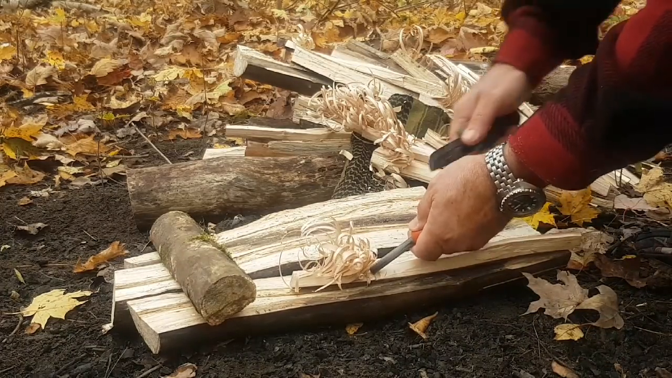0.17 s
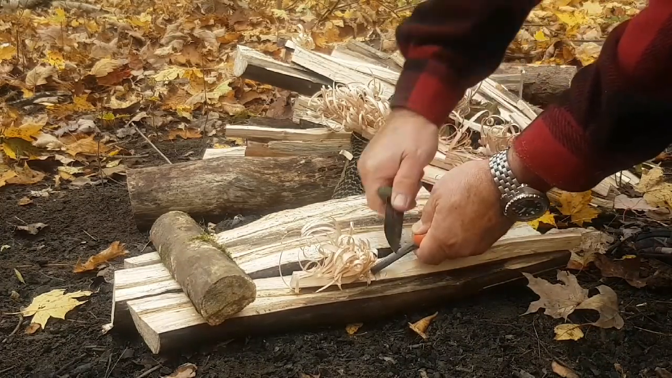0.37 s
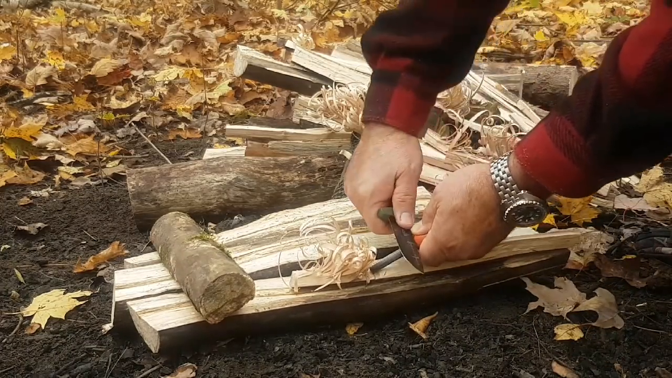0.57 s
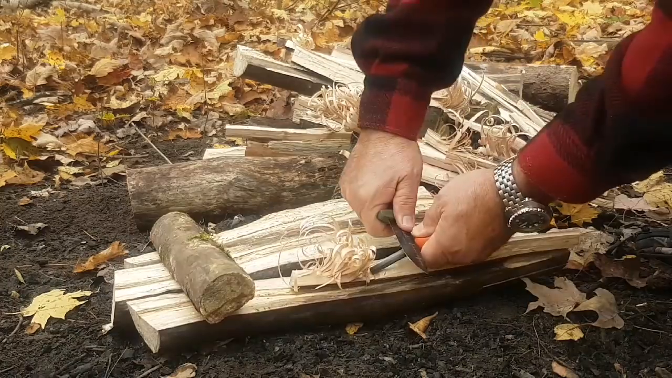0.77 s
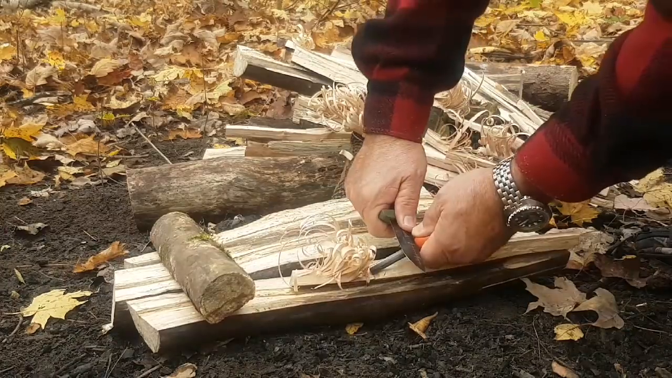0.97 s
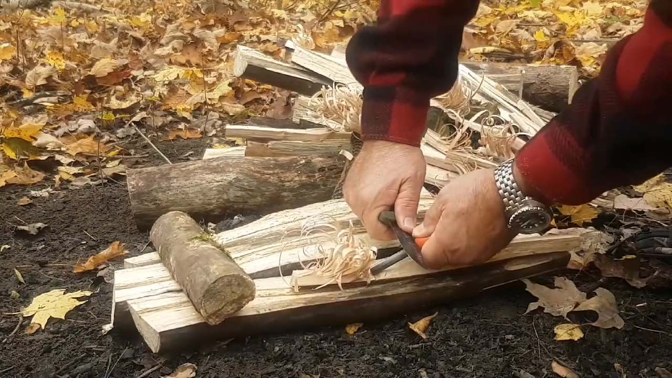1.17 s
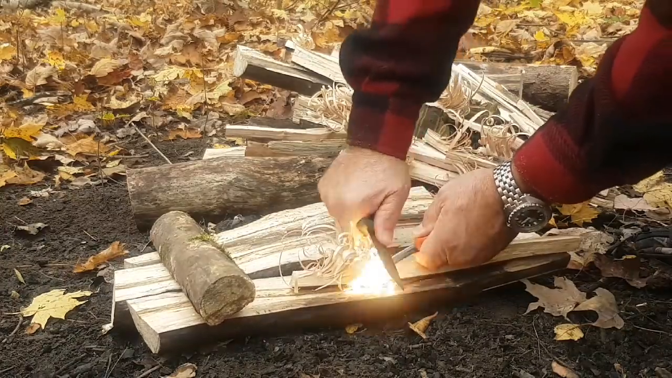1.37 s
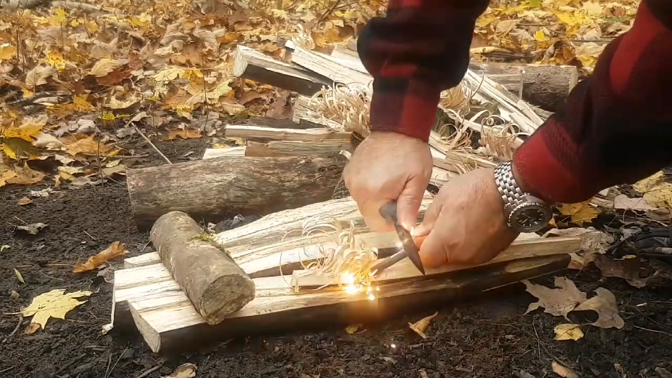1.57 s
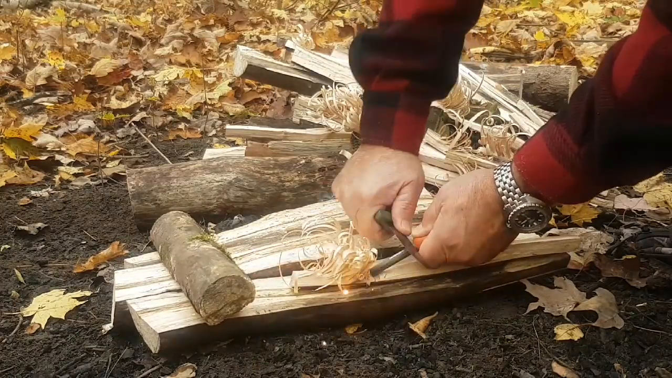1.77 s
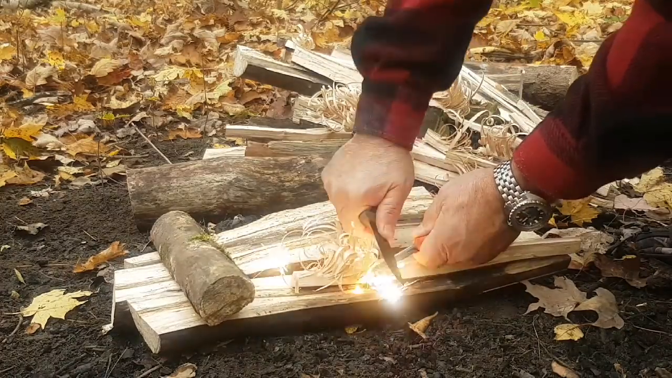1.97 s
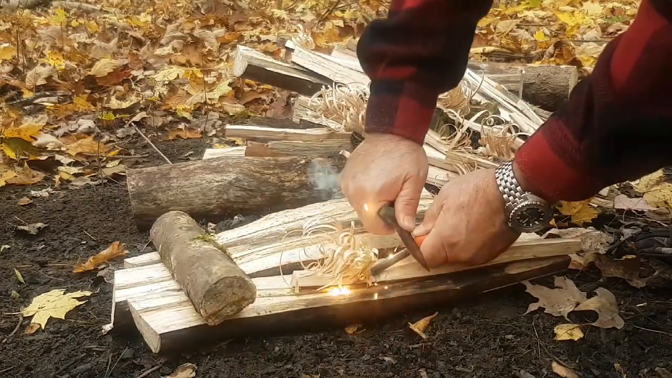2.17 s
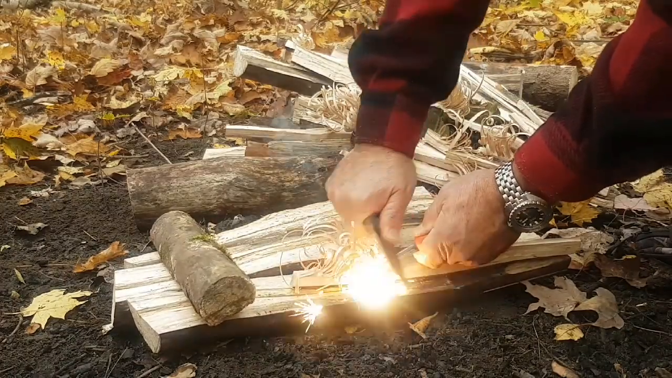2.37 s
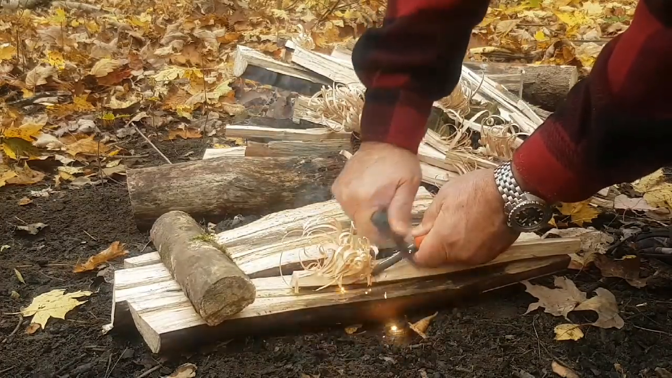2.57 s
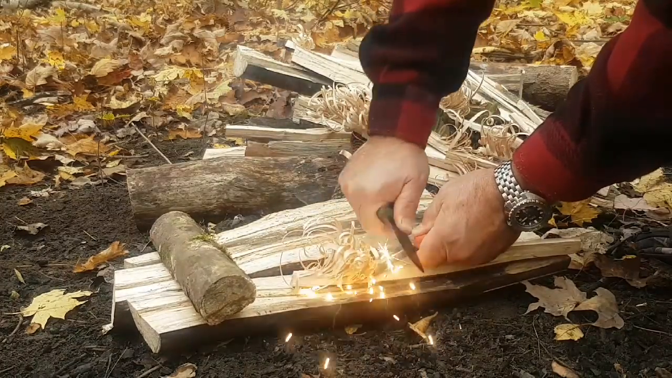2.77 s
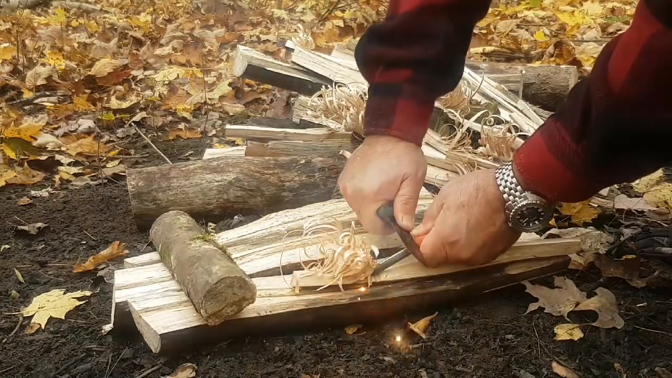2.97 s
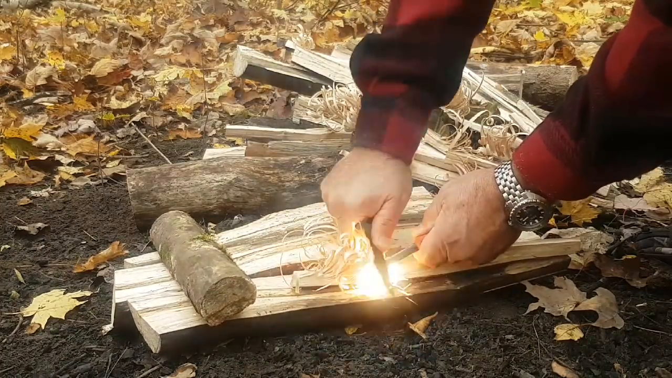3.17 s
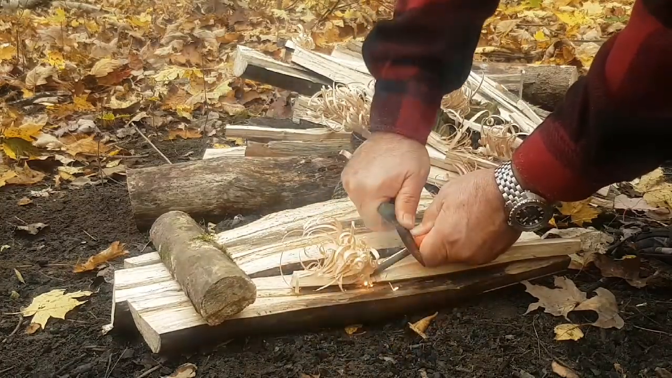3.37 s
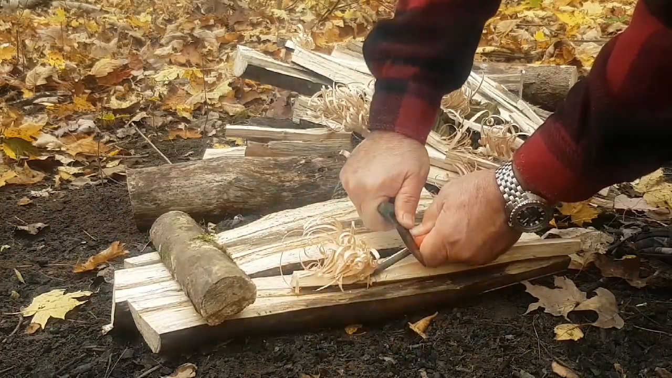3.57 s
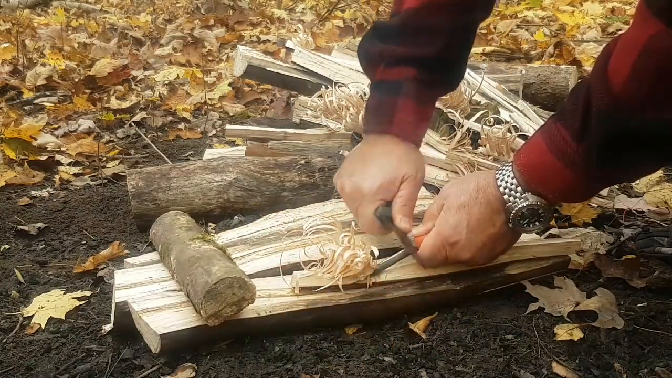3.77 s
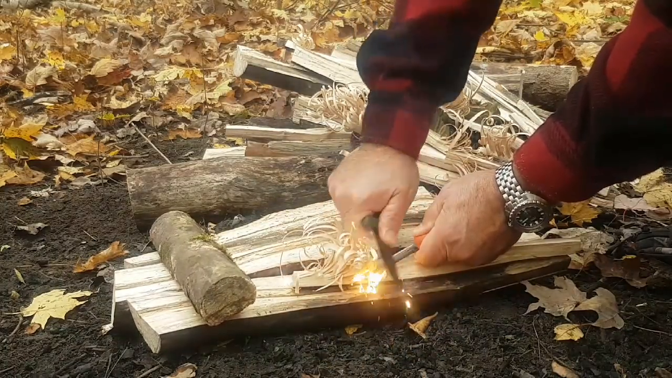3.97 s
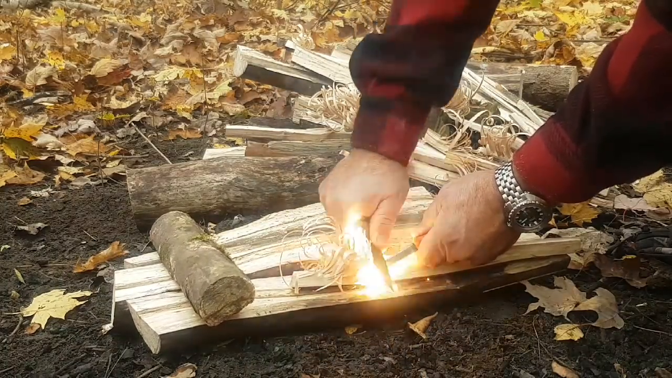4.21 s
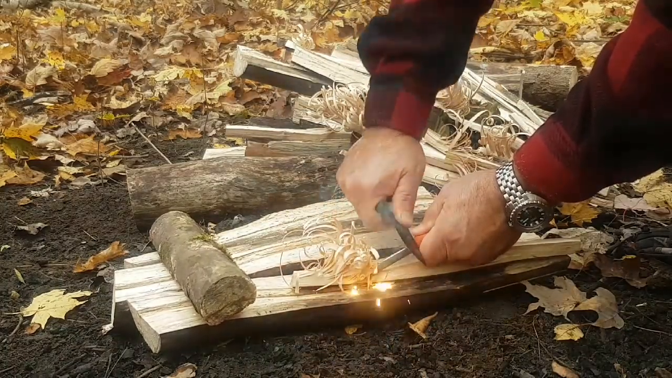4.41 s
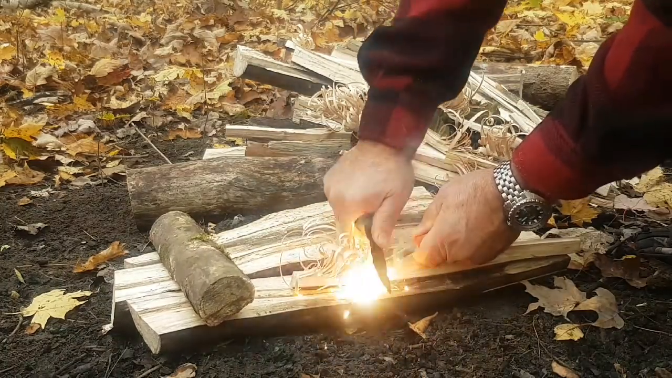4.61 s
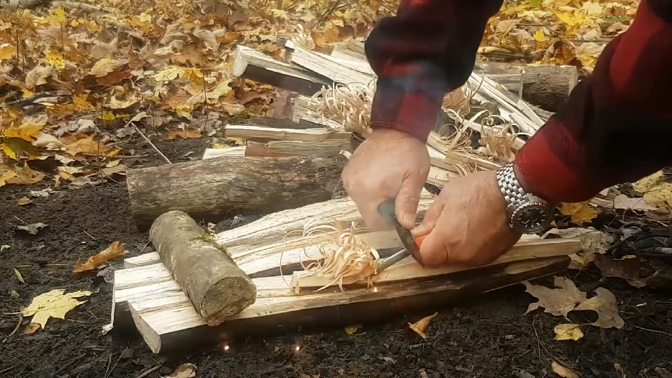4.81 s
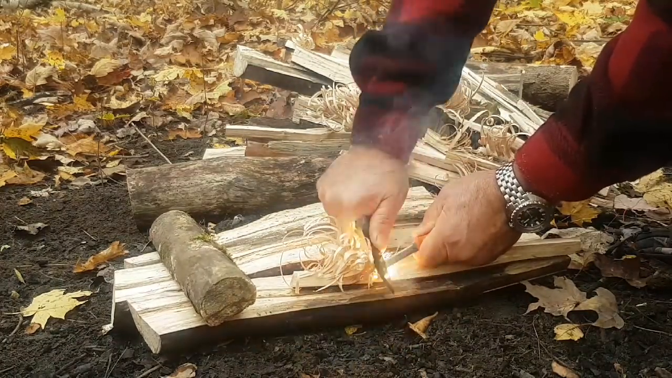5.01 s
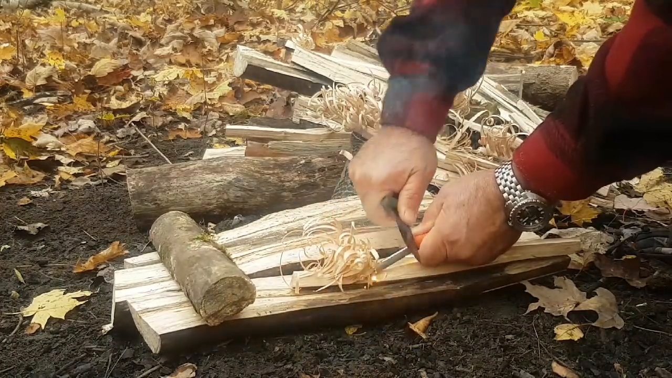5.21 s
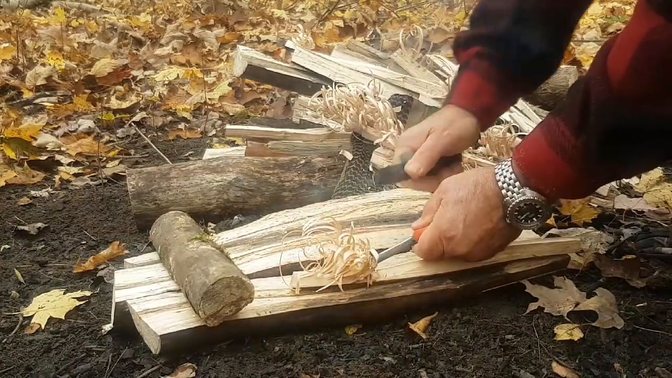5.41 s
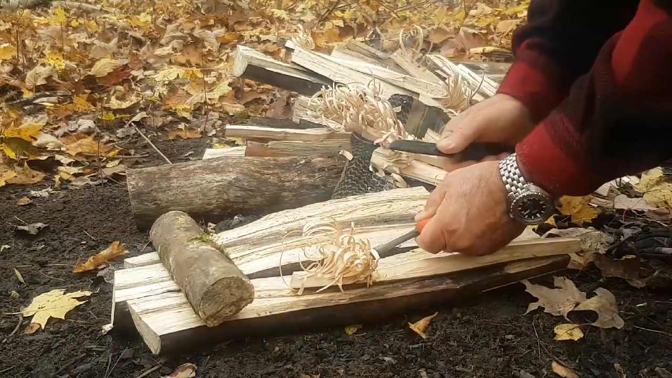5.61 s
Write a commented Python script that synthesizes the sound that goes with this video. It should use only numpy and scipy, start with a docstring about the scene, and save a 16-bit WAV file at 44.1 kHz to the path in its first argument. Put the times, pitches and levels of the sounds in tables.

```python
"""A low rumble of quiet woods, a light rustle and dry taps; then a knife scrapes a fire-steel rod, close by.
Nine hard pushes rasp: random fractures drive the edge, the rod, the blade and the board beneath.
The blade slides back lightly, squeaking while the rod sings in a wavering note, and knocks on the rod.
Noise bursts make spark pops, sharp treble ticks, crackle and fizz. Filtered noise makes the woods, with
a faint whine on the left and one far thin note; a short scattered echo surrounds the work."""
import sys
import numpy as np
from scipy import signal
from scipy.fft import rfft, irfft
from scipy.io import wavfile
from scipy.ndimage import uniform_filter1d, map_coordinates

SR = 44100
rng = np.random.default_rng(int(sys.argv[2]) if len(sys.argv) > 2 else 0)


def store_wav(level_fs):
    """Save 16-bit WAV to argv[1]."""
    pcm = np.round(np.clip(np.atleast_2d(level_fs), -1, 1) * 32767)
    wavfile.write(sys.argv[1], SR, pcm.T.astype(np.int16))


N = 249165
TIME = np.arange(N) / SR
FREQS = np.fft.rfftfreq(N, 1 / SR)

# hard pushes down the rod, levels before mix gains: start_s, attack_s, hold_s, length_s,
# edge_hiss_db, rod_and_board_shudder_db, ring_as_edge_leaves_db, coarse_rasp_db
PUSH_ROWS = [ (1.318, 0.022, 0.121, 0.225, -46, -49, -72.5, -49.5),
             (1.888, 0.0054, 0.039, 0.31, -41, -47, -51.5, -47),
             (2.234, 0.036, 0.0453, 0.303, -42.5, -46, -61, -48),
             (2.595, 0.0389, 0.045, 0.27, -41, -45, -46.5, -52),
             (3.049, 0.039, 0.054, 0.37, -44, -48, -54.5, -51),
             (3.805, 0.055, 0.02, 0.29, -40.5, -44, -45, -49),
             (4.182, 0.023, 0.028, 0.227, -41, -45, -55, -51),
             (4.504, 0.022, 0.096, 0.28, -45, -46.5, -52, -51),
             (4.919, 0.046, 0.025, 0.21, -43, -47.5, -42, -48)]
# resonances of the blade, before damping and pitch factors: pitch_hz, width_hz, relative_level_db
BLADE_MODES = [(2330, 300, 10), (2544, 176, 16.5), (3030, 205, 8.5)]
# resonances of the rod held against the board, likewise: pitch_hz, width_hz, relative_level_db
ROD_MODES = [(710, 170, -14), (1222, 65, 0), (1620, 140, -18)]
# spectrum of the cutting edge: frequency_hz, relative_level_db
EDGE_SPECTRUM = [(700, -6), (2800, 8), (4400, 3), (5200, 8), (6700, 6.5), (7500, 3), (8300, 4),
                 (9600, -3.5), (12200, 8), (13700, -3), (16000, -8.5)]
# spectrum of the rod pressed on the board: frequency_hz, relative_level_db
BOARD_SPECTRUM = [(40, -18.5), (125, 6.5), (195, 4.5), (280, -2.5), (430, 0.5), (760, 3.5), (1020, -2),
                  (1200, 1.5), (1450, -0.5), (1950, -1.5), (2550, -2), (3500, -7.5), (6000, -26)]


def amp(db):
    """Decibels to gain."""
    return 10 ** (np.asarray(db) / 20)


def unit(x):
    """Scales to rms 1."""
    return x / np.sqrt(np.mean(x ** 2) + 1e-20)


def read(points, hz=FREQS):
    """Joins (Hz, value) points on a log-frequency axis."""
    f, value = np.transpose(points)
    return np.interp(np.log(hz + 1), np.log(f + 1), value)


def wander(hz):
    """Smooth random curve of rms 1, with rates up to about hz."""
    return unit(irfft(rfft(rng.standard_normal(N)) * np.exp(-(FREQS / hz) ** 2), N))


def colour(points):
    """Causal (minimum-phase) frequency response with the given spectrum."""
    log_gain = np.log(amp(read(points, abs(np.fft.fftfreq(N, 1 / SR)))))
    return np.exp(np.conj(signal.hilbert(log_gain)))[:len(FREQS)]


def modes(table, damping=1):
    """Frequency response of damped modes; neighbours swing in opposite senses."""
    response = 0
    for k, (hz, width_hz, db) in enumerate(table):
        detuning = (hz ** 2 - FREQS ** 2) / (1j * (FREQS + 1) * width_hz * damping)
        response = response + (-1) ** k * amp(db) / (1 + detuning)
    return response


def pair(drive, response, likeness):
    """Filters two drives at unit power and blends them into partly alike left and right spectra."""
    a, b = rfft(drive) * response / np.sqrt(np.mean(abs(response) ** 2))
    same = np.clip(read(likeness), 0, 1)
    return np.array([a, same * a + np.sqrt(1 - same ** 2) * b])


def radiate(drive, response):
    """A force on the rod, heard through a response at two microphone ports."""
    # likeness of the two ports: frequency_hz, likeness
    port_likeness = [(200, .975), (1600, .96), (5000, .75), (15000, .55)]
    # level of left over right: frequency_hz, left_minus_right_db
    port_lean = [(150, 0), (600, -2.5), (1200, -1.5), (3000, -2.5), (5300, 1.5), (6800, -2), (8300, 4.5),
                 (10000, -0.5), (12200, 5.5), (14500, -4)]
    # phase lead of left over right: frequency_hz, lead_rad
    port_lead = [(2500, 0), (4050, .78), (6370, -.97), (7920, .73), (13200, -2), (16000, -.9)]
    lean = amp(read(port_lean) / 2) * np.exp(.5j * read(port_lead))
    return irfft(pair(drive, response, port_likeness) * np.array([lean, 1 / lean]), N)


def grit(per_s, spread_db, judder_db, judder_hz):
    """Tiny fractures of uneven size, bunched by the stick and slip of the edge."""
    sizes = amp(spread_db * np.minimum(rng.exponential(1, N), 4))
    sizes = sizes * (rng.random(N) < per_s / SR)
    bunches = amp(judder_db * np.clip(wander(judder_hz), -2, 2))
    return unit(sizes * bunches * rng.choice([-1., 1.], (2, N)))


def gate(t, length_s, rise_s):
    """Opens over the rise time and closes as the blade lifts off."""
    lift_off_s = 0.0069
    return np.clip(t / rise_s, 0, 1) * np.clip((length_s - t) / lift_off_s, 0, 1)


def push_level(order, lag_s=0, depth=1):
    """Gain of all pushes from one dB column: swell from first touch, hold, ease off, trail away."""
    touch_db, eased_db, release_s, trail_db_per_s = -37, -10, 0.029, 116
    gain = np.zeros(N)
    for row in PUSH_ROWS:
        start_s, attack_s, hold_s, length_s = row[:4]
        t = TIME - start_s
        after_s = np.maximum(t - attack_s - hold_s - lag_s, 0)
        swell_db = touch_db * np.clip(1 - t / (attack_s + lag_s), 0, 1) ** 1.26
        ease_db = eased_db * np.minimum(after_s / release_s, 1)
        ease_db -= trail_db_per_s * np.maximum(after_s - release_s, 0)
        gain += amp(row[order] + depth * (swell_db + ease_db)) * gate(t, length_s, rise_s=0.013)
    return gain


def bite_level():
    """The blade rings as the edge digs in, until the full pressure damps it."""
    bite_db, fade_s = -4.5, 0.0043
    gain = np.zeros(N)
    for start_s, attack_s, _, _, hiss_db, *_ in PUSH_ROWS:
        t = TIME - start_s
        rise = np.clip(t / attack_s, 0, 1)
        gain += amp(hiss_db + bite_db) * rise * np.exp(-np.maximum(t - attack_s, 0) / fade_s)
    return gain


def pushes():
    """Fine fractures hiss at the edge and shake rod and board; coarse ones rasp through gripped steel."""
    fractures = grit(per_s=14000, spread_db=1.0, judder_db=1.8, judder_hz=246)
    # the hand's pressure catches and lets go
    catches = amp(2.1 * np.clip(wander(82), -2, 2))
    hiss = radiate(fractures * push_level(order=4), colour(EDGE_SPECTRUM))
    bite = radiate(fractures * bite_level(), modes(BLADE_MODES) + amp(15) * modes(ROD_MODES))
    # heavy rod and board follow the edge late, over a narrower range of level
    shake = push_level(order=5, lag_s=0.013, depth=0.58)
    shudder = radiate(fractures * catches * shake, colour(BOARD_SPECTRUM))
    chips = grit(per_s=2000, spread_db=1.5, judder_db=3.2, judder_hz=220)
    grip_damping = 8  # factor on the resonance widths
    gripped_steel = modes(BLADE_MODES, grip_damping) + amp(14) * modes(ROD_MODES, grip_damping)
    rasp = radiate(chips * push_level(order=7), gripped_steel)
    return amp(-0.1) * hiss + bite + amp(2.5) * shudder + rasp


def slide_levels():
    """Gains of squeak and ring: quick catch, a fading ring, a squeak peaking above a steady scratch."""
    # light slides of the blade, levels before mix gains:
    # start_s, length_s, rod_ring_db, squeak_peak_after_s, squeak_db
    slide_rows = [ (1.488, 0.0454, -52, 0.033, -47), (2.049, 0.068, -59, 0.06, -51.5),
                  (2.383, 0.099, -44.5, 0.065, -50), (2.739, 0.092, -50, 0.054, -52.5),
                  (3.184, 0.16, -49.5, 0.12, -54.5), (3.812, 0.032, -54, 0.028, -52),
                  (3.957, 0.109, -49, 0.063, -52.5), (4.307, 0.099, -48.5, 0.067, -50.5),
                  (4.664, 0.15, -52.5, 0.059, -53.5), (5.067, 0.12, -55, 0.07, -58)]
    catch_s, ring_fade_db_per_s = 0.0087, 53
    squeak_width_s, scratch_db = 0.028, -10.5
    squeak, ring = np.zeros((2, N))
    for start_s, length_s, ring_db, peak_after_s, squeak_db in slide_rows:
        t = np.maximum(TIME - start_s, 0)
        contact = gate(t, length_s, catch_s)
        swell = 1 / (1 + ((t - peak_after_s) / squeak_width_s) ** 2)
        squeak += contact * amp(squeak_db + scratch_db * (1 - swell))
        ring += contact * amp(ring_db - ring_fade_db_per_s * t)
    return squeak, ring


def spring_level():
    """The rod sings for a moment around the end of each hold, as the edge leaves it."""
    spring_s = 0.016
    gain = np.zeros(N)
    for start_s, attack_s, hold_s, _, _, _, ring_db, _ in PUSH_ROWS:
        offset = (TIME - start_s - attack_s - hold_s) / spring_s
        gain += amp(ring_db) * np.exp(-np.minimum(offset ** 2 / 2, 20))
    return gain


def bend(x, speed):
    """Raises or lowers every resonance of a sound by a changing factor."""
    position = [np.cumsum(speed)]
    return np.array([map_coordinates(side, position, order=3, mode="mirror") for side in x])


def slides():
    """The light blade chatters over the scored rod: blade squeaks, rod sings, as it does on springing back."""
    squeak_gain, slide_gain = slide_levels()
    spring_gain = spring_level()
    ring_gain = slide_gain + spring_gain
    chatter = grit(per_s=4500, spread_db=1.0, judder_db=3.5, judder_hz=143)
    # the contact point wanders, and the blade's resonances move with it
    squeak = squeak_gain * bend(radiate(chatter, modes(BLADE_MODES)), 1 + 0.028 * wander(218.7))
    ring = radiate(chatter * ring_gain, modes(ROD_MODES))
    # stick and slip lock onto the rod's main resonance, flatter while the rod springs back after a hold
    sing_hz, spring_flat_hz, waver_hz, beads_per_s = 1244, 45, 36, 62
    spring_share = spring_gain / (ring_gain + 1e-9)
    pitch_hz = sing_hz - spring_flat_hz * spring_share + waver_hz * wander(110)
    phase = 2 * np.pi * np.cumsum(pitch_hz) / SR
    bead_rate = beads_per_s * (1 + .5 * wander(50))
    beads = abs(np.sin(np.pi * np.cumsum(bead_rate) / SR))
    note = np.sin(phase) * (.55 + beads) * amp(2 * np.clip(wander(200), -3, 1.3))
    # second harmonic of the slips falls on the blade's main resonance
    octave = .8 * np.sin(2 * phase) * amp(3.5 * np.clip(wander(120), -3, 1.3))
    return amp(3.5) * squeak + amp(-4.0) * ring + note * ring_gain + octave * squeak_gain


def add(mix, s, sound):
    """Mixes a short two-channel sound in at time s."""
    part = mix[:, round(s * SR):][:, :sound.shape[1]]
    part += sound[:, :part.shape[1]]


def contact_force(contact_s):
    """The force of a contact swells and fades on the scale of contact_s, at unit energy."""
    u = TIME[:SR // 10] / max(contact_s, 1e-4)
    force = u ** 2 * np.exp(-3.8 * u)
    return force / np.linalg.norm(force)


def ringing(table, pitch_hz, force, damping):
    """Modes swell under a force and die away, tuned by the second row; their joint envelope peaks at 1."""
    t = TIME[:len(force)]
    # a skidding contact makes the pitch waver
    waver_share = .045
    waver = unit(uniform_filter1d(rng.standard_normal(len(t)), size=60))
    turns = np.cumsum(pitch_hz / table[1][0] * (1 + waver_share * waver)) / SR
    swells = []
    for _, width_hz, db in table:
        decay = np.exp(-np.pi * width_hz * damping * t)
        swells.append(amp(db) * unit(signal.fftconvolve(force, decay)[:len(t)]))
    ring = 0
    for swell, mode in zip(swells, table):
        ring = ring + swell * np.sin(2 * np.pi * (mode[0] * turns + rng.random((2, 1))))
    return ring / np.linalg.norm(swells, axis=0).max()


def knocks_and_bite():
    """Brief skids, one a longer gritty bite: blade and rod ring, grit clicks at the edge, thuds in the board."""
    # knocks of blade on rod, and one longer gritty bite early in the first push; pitch set by where touched:
    # start_s, blade_db, rod_db, click_db, board_db, contact_s, blade_pitch_hz
    contact_rows = [ (0.59, -57, -50.5, -62, -33, 0.0068, 3120), (1.336, -43.5, -48, -32, -18, 0.02, 3100),
                    (1.7698, -48, -42.5, -25, -26, 0.0057, 3120),
                    (2.1182, -33, -34, -23.5, -20, 0.0043, 2420),
                    (2.502, -53, -44, -42, -28.5, 0.0049, 2380),
                    (2.745, -49, -37.5, -45, -16, 0.0087, 2500), (2.876, -55, -43, -47, -29, 0.0058, 2440),
                    (3.072, -55, -52.5, -33, -19, 0.0072, 2430),
                    (3.346, -48, -42.5, -37, -24.5, 0.0042, 2247),
                    (3.7986, -32, -38.5, -25.5, -18.5, 0.0033, 2490),
                    (3.962, -39, -39, -40, -17.5, 0.0099, 2582),
                    (4.391, -33.5, -37.5, -27, -19.5, 0.0024, 2480),
                    (4.445, -62, -57, -34, -26, 0.0031, 2500),
                    (5.236, -53, -52.5, -56, -27.5, 0.0056, 2250)]
    rod_hz, damping = 1250, 2.5  # firm contact widens the resonances by the damping factor
    rings, on_edge, on_board = np.zeros((3, 2, N))
    for s, blade_db, rod_db, click_db, board_db, contact_s, blade_hz in contact_rows:
        force = contact_force(contact_s)
        add(rings, s, amp(blade_db) * ringing(BLADE_MODES, blade_hz, force, damping))
        add(rings, s, amp(rod_db) * ringing(ROD_MODES, rod_hz, force, damping))
        add(on_edge, s, amp(click_db) * force * rng.choice([-1., 1.], (2, len(force))))
        add(on_board, s, amp(board_db) * force * rng.choice([-1., 1.], (2, len(force))))
    clicks = radiate(on_edge, colour(EDGE_SPECTRUM))
    thuds = radiate(on_board, colour(BOARD_SPECTRUM))
    return radiate(rings, 1) + clicks + thuds


def taps():
    """The edge is set down on the rod: a very short force rings its modes as one dry, crisp click."""
    # edge set down: start_s, level_db, pitch_hz
    tap_rows = [(0.482, -32.5, 1194), (1.249, -45, 1490), (1.285, -52, 1400), (1.313, -43, 1280),
                (1.773, -36, 1320), (2.547, -49, 1010), (2.5805, -58, 1150)]
    # what rings, before damping and pitch factors: pitch_hz, width_hz, relative_level_db
    tip_modes = [(900, 240, 2), (1217, 140, 2.5), (2340, 620, 6), (3130, 160, 4), (3810, 220, -3),
                 (4600, 900, -9), (5400, 620, -2)]
    clicks = np.zeros((2, N))
    for s, db, pitch_hz in tap_rows:
        force = contact_force(contact_s=0.00009)
        add(clicks, s, amp(db) * ringing(tip_modes, pitch_hz, force, damping=0.72))
    return radiate(clicks, 1)


def sparks_and_ticks():
    """Sparks and other sharp treble ticks: a snap and a short noise sputter; small crackles in each push."""
    # sparks and other sharp treble ticks, one at a push's onset, levels before mix gain:
    # start_s, snap_db, sputter_db
    tick_rows = [(1.558, -19, -21.5), (2.007, -42, -22), (2.3627, -35, -16), (2.4244, -49, -25),
                 (2.96, -44, -42), (3.2455, -47, -40), (3.948, -41, -40), (4.183, -46, -35),
                 (4.3, -39, -24), (4.4588, -44, -34), (4.475, -40, -43), (4.786, -38, -30),
                 (5.19, -54, -42.5)]
    # spectrum of a spark or tick: frequency_hz, relative_level_db
    spark_spectrum = [(200, 0), (5000, 1), (12000, 1), (16000, -7.5)]
    snaps, sputters = np.zeros((2, N))
    for s, snap_db, sputter_db in tick_rows:
        snaps[int(s * SR)] = amp(snap_db)
        sputters[int(s * SR)] = amp(sputter_db)
    t = TIME[:2000]
    fade = .13 * np.exp(-t / .0012) + .028 * np.exp(-t / .008)
    sputter = fade * rng.standard_normal((2, len(t)))
    crackles_per_s = 70
    crackle = rng.exponential(0.28, N) * (rng.random(N) < crackles_per_s / SR)
    crackle = amp(-8) * push_level(order=4) ** 0.69 * crackle
    force = signal.fftconvolve((sputters + crackle)[None], sputter, axes=1)[:, :N]
    force[0] += snaps + crackle
    return amp(3.5) * radiate(force, colour(spark_spectrum))


def fizz_level():
    """Each fizz rises quickly, holds briefly and dies away."""
    # short treble fizzes and faint clusters of ticks: start_s, rise_and_hold_s, level_db
    fizz_rows = [(1.556, 0.047, -55.5), (1.996, 0.01, -63), (2.034, 0.015, -60), (2.103, 0.024, -50.5),
                 (2.185, 0.028, -69.5), (2.376, 0.03, -45.5), (3.185, 0.052, -53), (4.309, 0.048, -53),
                 (5.086, 0.011, -55.5)]
    rise_s, fade_db_per_s = .012, 304
    gain = np.zeros(N)
    for start_s, hold_s, db in fizz_rows:
        t = TIME - start_s
        gain += np.clip(t / rise_s, 0, 1) * amp(db - fade_db_per_s * np.maximum(t - hold_s, 0))
    return gain


def fizzes():
    """Short treble fizzes and faint clusters of ticks over a soft, low puff, driven by the same grit."""
    drive = fizz_level() * grit(per_s=9000, spread_db=0.0, judder_db=4.0, judder_hz=156)
    fizz = radiate(drive, colour(EDGE_SPECTRUM))
    puff = radiate(drive, colour(BOARD_SPECTRUM))
    return fizz + puff


def rubs():
    """Light shifting of blade and hands: a soft rustle with sparse dry ticks."""
    # blade and hands shift between strokes: start_s, end_s, level_db
    rub_rows = [(0.447, 0.687, -64.5), (1.23, 1.34, -69.5), (2.525, 2.655, -53.5), (4.162, 4.195, -56),
                (4.422, 4.5, -60), (5.116, 5.286, -62)]
    touch = np.zeros(N)
    for start_s, end_s, db in rub_rows:
        middle_s = (start_s + end_s) / 2
        touch += amp(db) * np.interp(TIME, [start_s, middle_s, end_s], [0, 1, 0]) ** .5
    soft_grit = grit(per_s=4000, spread_db=1.0, judder_db=3.5, judder_hz=60)
    sparse_grit = grit(per_s=700, spread_db=1.2, judder_db=2.5, judder_hz=60)
    rustle = radiate(touch * soft_grit, colour(BOARD_SPECTRUM))
    ticks = radiate(touch * sparse_grit, colour(EDGE_SPECTRUM))
    return rustle + amp(-9.5) * ticks


def ground():
    """The weight of the pushes, smoothed over a third of a second, heaves the board dully on the soil."""
    # spectrum of the board on the soil: frequency_hz, relative_level_db
    soil_spectrum = [(25, -5), (60, 18), (130, -17), (500, -75)]
    weight = uniform_filter1d(push_level(order=5, depth=0.41), size=SR // 3)
    return amp(-12) * radiate(weight * rng.standard_normal((2, N)), colour(soil_spectrum))


def surroundings(x):
    """Board, ground and trunks scatter a thin, quickly fading echo."""
    t = TIME[:SR // 2]
    scatter = rng.standard_normal((2, len(t))) * (t > .003)
    # near part falls 60 dB in 55 ms, faint far part in 550 ms
    fade = amp(-60 * t / .055) + amp(-24) * amp(-60 * t / .55)
    tail = signal.lfilter([1], [1, -.6], scatter * fade)
    return signal.fftconvolve(x, tail / np.linalg.norm(tail[0]), axes=1)[:, :N]


def far_call():
    """One faint, thin note from far off, perhaps a bird: a wavering sine."""
    swell = np.interp(TIME, [2.92, 2.96, 3.01, 3.05], [0, 1, 0.97, 0])
    pitch_hz = 1850 + 45 * wander(200)
    return amp(-70) * swell * np.sin(2 * np.pi * np.cumsum(pitch_hz) / SR)


def woods():
    """Distant air as low filtered noise of very slightly varying level, and a faint thin whine on the left."""
    # spectrum of the still woods: frequency_hz, relative_density_db_per_hz
    air_spectrum = [(20, -13), (40, -21), (55, -6.5), (92, -5.5), (112, -3), (150, -12.5), (500, -19.5),
                    (900, -24), (2500, -29), (6000, -42), (9000, -46), (16000, -44)]
    # likeness of the woods at the two ports: frequency_hz, likeness
    air_likeness = [(60, 1), (380, 0.72), (1500, 0)]
    air = irfft(pair(rng.standard_normal((2, N)), amp(read(air_spectrum)), air_likeness), N)
    air *= amp(-57 + 0.19 * wander(29))
    whine_hz = 14250 + 35 * wander(120)
    whine = amp(-81) * np.sin(2 * np.pi * np.cumsum(whine_hz) / SR)
    return air * amp([[-.4], [.4]]) + whine * np.array([[1], [.2]])


def scene():
    """The knife work and its echo over the quiet of the woods."""
    strokes = pushes() + slides() + knocks_and_bite() + taps()
    work = strokes + sparks_and_ticks() + fizzes() + rubs() + ground()
    return work + amp(-16.0) * surroundings(work) + far_call() + woods()


def record(dry):
    """The recorder's band limit: a steep linear-phase lowpass."""
    edge_hz = 15900
    lowpass = signal.firwin(511, edge_hz, window=("kaiser", 9), fs=SR)
    return signal.oaconvolve(dry, lowpass[None], "same")


dry = scene()
out = record(dry)
store_wav(out)
```